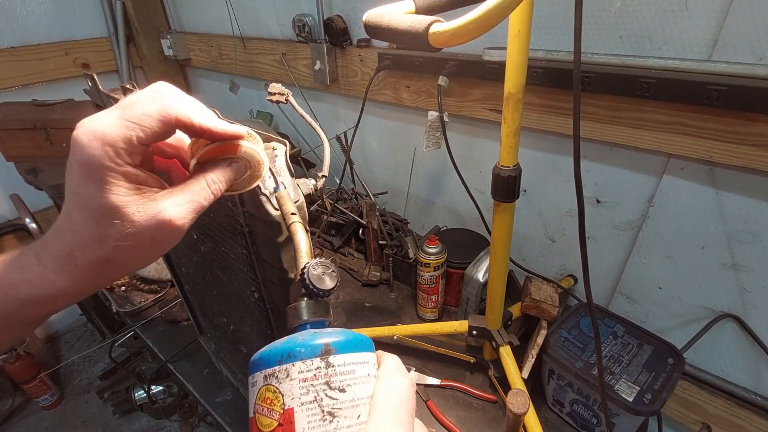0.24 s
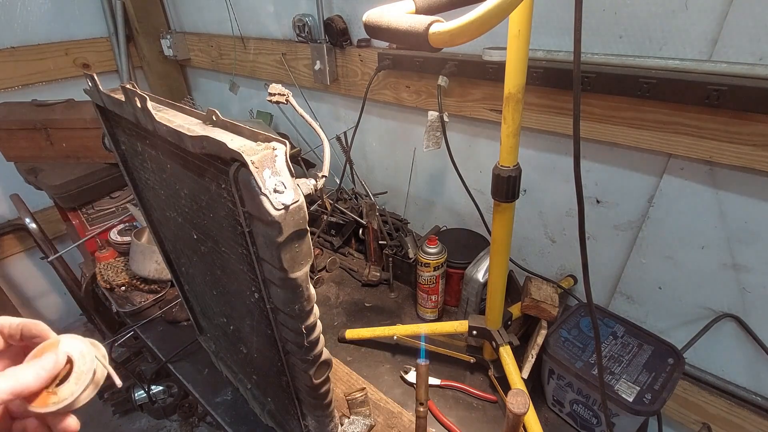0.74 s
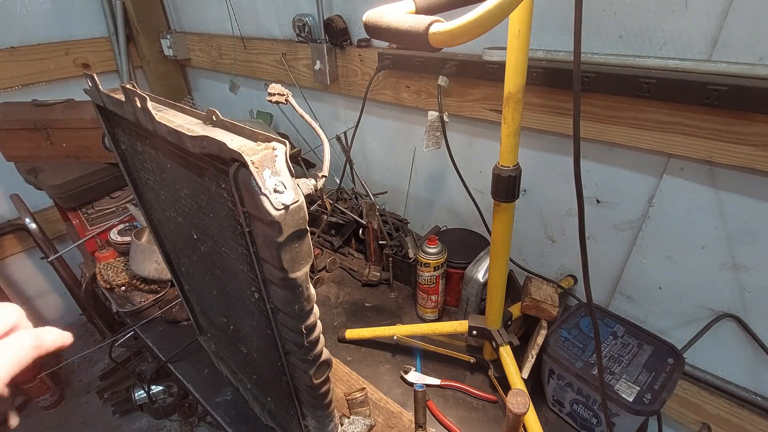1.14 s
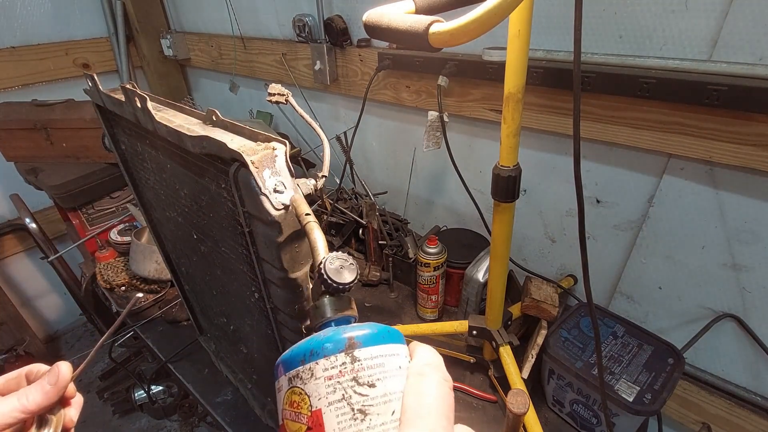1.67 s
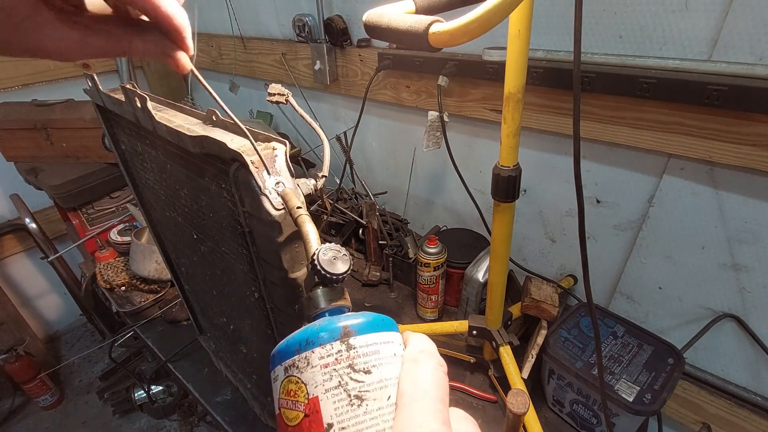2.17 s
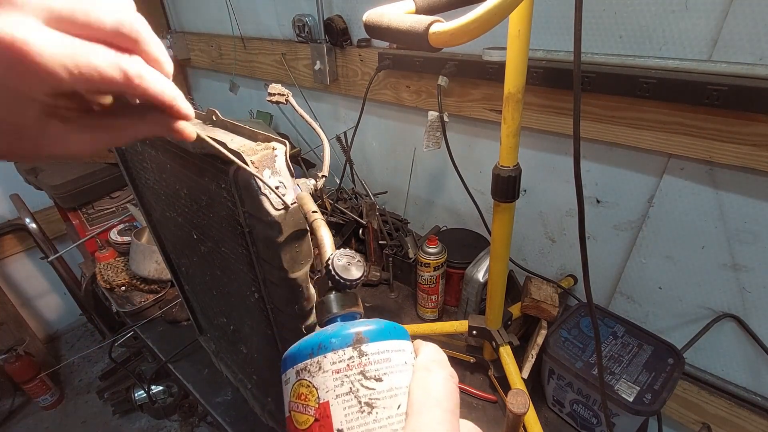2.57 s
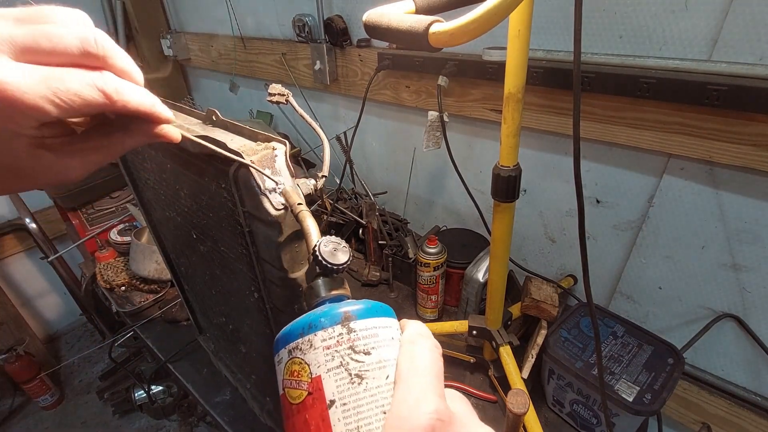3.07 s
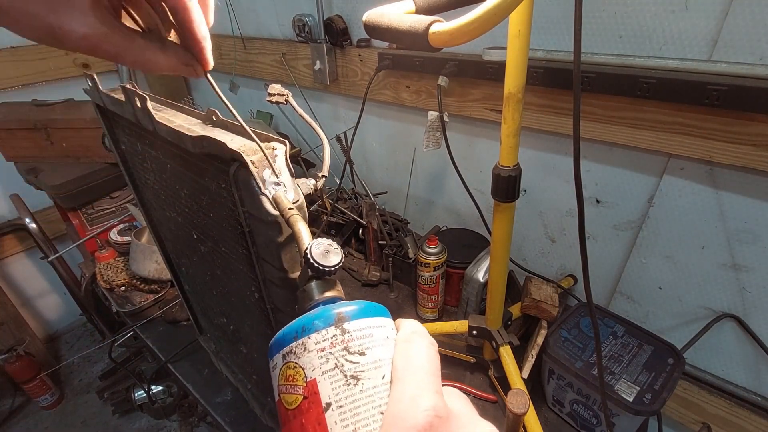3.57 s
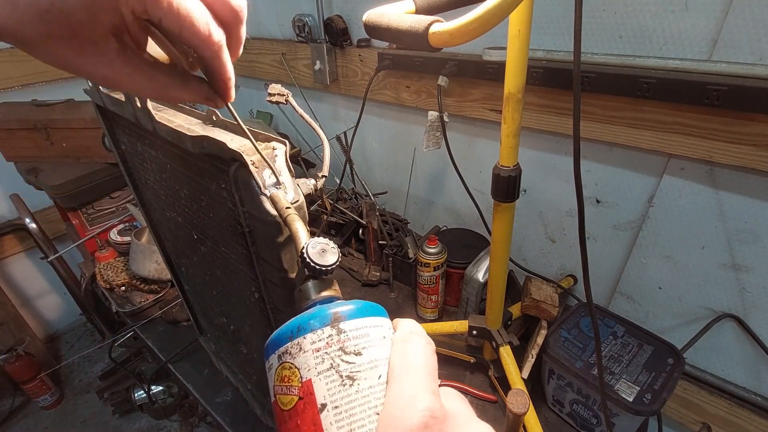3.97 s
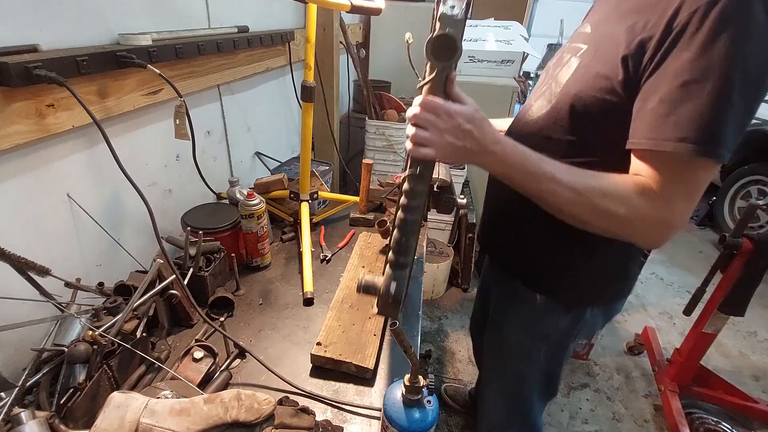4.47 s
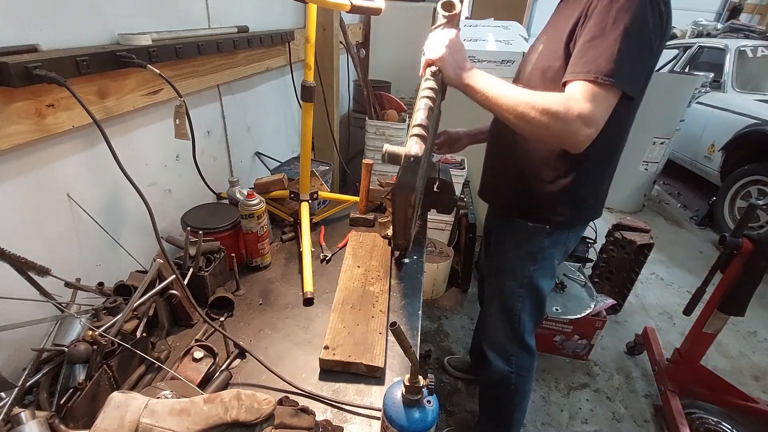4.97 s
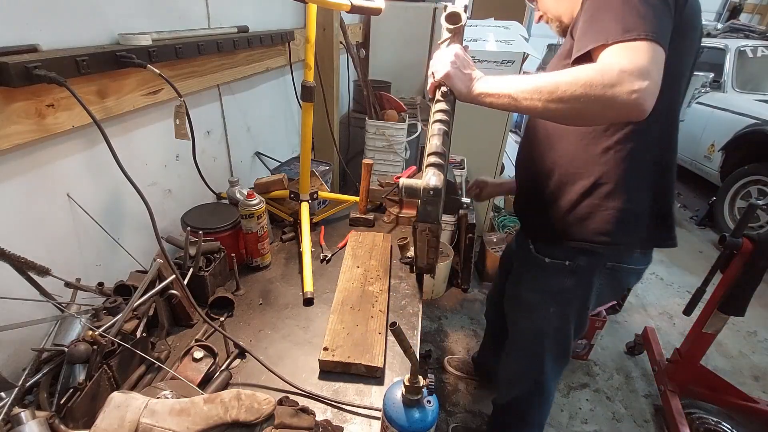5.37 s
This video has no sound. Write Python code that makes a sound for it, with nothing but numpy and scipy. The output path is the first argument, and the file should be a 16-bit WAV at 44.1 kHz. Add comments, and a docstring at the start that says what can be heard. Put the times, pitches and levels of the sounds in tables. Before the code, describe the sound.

From the start, a handheld gas torch burns close to the microphone, slightly left, in a workshop: a low, fluttering roar under a bright hiss and a faint, breathy high whistle. The flame rasps against a metal radiator, with brief flares. Around 0.8 seconds the rasp eases and there is one dull knock. At about 1.5 seconds the rasp returns and holds, with tiny spitting pops near 3.1, 3.8 and 4.2 seconds. The torch cuts off abruptly at 4.4 seconds. After an instant of silence, the radiator is handled with a thin rustle, short scrapes and a few ringing metallic clicks, the sharpest near 4.8 seconds. From 5 seconds it slides and lands on a wooden bench with a low rumble and dull, rattling knocks, loudest at 5.2 seconds. Lighter bumps and ticks continue until about 5.6 seconds.

```python
"""A gas torch roars close on the left, hisses at its jet and splashes on a metal radiator. All three are
turbulent noise, coloured by shifting reflections and reaching two microphone ports out of phase. The scene
changes. After a brief silence the radiator is shifted on a bench: friction gives a thin rustle and scrapes, and
impacts ring the metal's modes as clicks. Then the weight slides and lands on the wood with a low rumble and
dull knocks."""
import sys
import numpy as np
from scipy import signal
from scipy.fft import rfft, irfft, next_fast_len
from scipy.io import wavfile
from scipy.ndimage import uniform_filter1d

SR = 44100
rng = np.random.default_rng(int(sys.argv[2]) if len(sys.argv) > 2 else 0)


def materialize(psi):
    """Save the field psi as 16-bit PCM at rate SR to the path in sys.argv[1].

    A 1-D psi becomes a single channel; in a 2-D psi each row is a channel.
    """
    bounded = np.clip(np.atleast_2d(psi).T, -1, 1)
    quanta = np.round(bounded * 32767).astype(np.int16)
    wavfile.write(sys.argv[1], SR, quanta)


N = 247794
T = np.arange(N) / SR
N_FFT = next_fast_len(N)
F = np.maximum(np.arange(N_FFT // 2 + 1) * SR / N_FFT, 1.)
SIDES = np.array([[1], [-1]])  # left, right

# The moving torch: t/s, roar level/dB, jet level/dB, whistle level/dB, left minus right/dB
TORCH_LEVELS = [(0, -43.5, -55.5, -64, 6), (.22, -45, -57.5, -66, 3.5), (.45, -47, -57, -68, 3.5),
                (.6, -46.5, -55.5, -65, 5), (.84, -48, -53, -62, 3), (.93, -50.5, -55.5, -74, 5),
                (1.12, -47, -58, -78, 2.5), (1.3, -49, -58, -81, 4.5), (1.34, -42.5, -56, -74, -1),
                (1.42, -47.5, -54, -67, 5.5), (1.65, -44, -60, -61, 4), (2., -44.5, -57, -58, 5),
                (2.2, -47, -56, -59, 5.5), (2.33, -46.5, -55.5, -67, 5), (2.5, -45.5, -57, -63, 4.5),
                (2.7, -44.5, -55, -62, 4.5), (2.85, -46.5, -55, -62, 4), (3.05, -46.5, -56, -63, 4.5),
                (3.2, -46, -57, -66, 5), (3.36, -50.5, -55.5, -57, 4.5), (3.5, -48.5, -57.5, -65, 5.5),
                (3.7, -47, -57, -61.5, 4.5), (3.95, -47, -56.5, -59, 5), (4.2, -50, -58.5, -62, 5.5),
                (4.3, -45, -52.5, -75, 3.5), (4.41, -47.5, -51, -71, 6.5)]
# Timbre as it turns: t/s, whistle f/Hz, jet top gain/dB, lowest roar gain/dB, upper roar gain/dB
TORCH_TIMBRE = [(0, 11950, -4, -0.5, -1), (.4, 12200, -4, -3, -0.5), (.8, 12550, -7, 2, 2),
                (.93, 12400, -4, 0.5, -4), (1.3, 12400, -2, -1, 0), (1.45, 12200, -4, -1, -1),
                (1.75, 12650, 0, -1, -1.5), (2.05, 12450, -3, 1, -3), (2.4, 12500, -3, -0.5, 0.5),
                (2.8, 12600, -1, -1.5, 0), (3.3, 12500, 0, 0, 2.5), (3.65, 12600, -1, -1.5, 0),
                (4.03, 12700, 1, 2.5, 0), (4.3, 12500, -6, -3, -0.5), (4.41, 12500, -10, -3, -2.5)]
# Its bearing: t/s, stereo width/dB, lean of the jet to the left/dB
TORCH_AIM = [(0, -1, 3), (.42, -0.5, -1), (.55, 0.5, 1), (.76, -1.5, 2), (.9, -2.5, -4), (.94, -5.5, -2),
             (1.36, -7, -1), (1.42, -1.5, 1.5), (1.85, -0.5, 1), (2.3, -0.5, -2), (2.6, 0, 2.5),
             (3.1, -0.5, 1.5), (3.3, 0.5, 6.5), (3.5, 0, 4), (4., 0.5, 4), (4.25, 0, 1), (4.41, -0.5, 3.5)]
def torch():
    """Turbulence radiates broadband noise; one unsteady flow gives its bands a common flutter."""
    roar_db, jet_db, whistle_db, pan_db = curve(TORCH_LEVELS)
    whistle_hz, top_db, lowest_db, upper_roar_db = curve(TORCH_TIMBRE)
    width_db, lean_db = curve(TORCH_AIM)
    low_db, rasp_db, upper_db, sizzle_db, intake_db = impingement()
    flutter = walk(28.13)
    roaring = roar(roar_db, lowest_db, upper_roar_db, flutter)
    splashing = splash(low_db, rasp_db, upper_db, flutter)
    gas = sizzle(sizzle_db, flutter) + jet(jet_db, top_db, flutter) * pan(lean_db)
    hiss = air_intake(intake_db) + reflections(splashing, 2.4, 200, .12) + reflections(gas, 2.5, 200, .1)
    hiss += whistle(whistle_hz, whistle_db) * pan(lean_db)
    roaring = reflections(roaring, 1.77, 90, .063)
    return stereo_width(roaring * pan(pan_db), .79 * width_db) + stereo_width(hiss * pan(pan_db), width_db)

# Combustion spectrum: f/Hz, level/dB
ROAR_SPECTRUM = [(15, -60), (25, -12.5), (43, -17), (86, -5), (179, -2.5), (236, -0.5), (340, -2),
                 (457, -5), (593, -9), (719, -19), (1000, -22), (1250, -16.5), (1600, -11), (2080, -23),
                 (3520, -120)]
def roar(db, lowest_db, upper_db, flutter):
    """Combustion noise: unsteady heat release expands the gas and radiates mainly low frequencies."""
    flame = port_noise(ROAR_SPECTRUM, .89) * undb(db + .4 * flutter + 1.2 * walk(9) + .6 * walk(45))
    lowest, rest = split(flame, hz=150)
    middle, upper = split(rest, hz=330)
    return lowest * undb(lowest_db) + middle + upper * undb(upper_db)

# Flame on metal: start t/s, end t/s, rasp level/dB, upper rasp gain/dB
FLAME_CONTACTS = [(-.1, 0.72, -49, 0), (1.54, 1.662, -47, -2), (1.664, 1.76, -45.5, -2.5),
                  (1.784, 2.265, -50.5, 0.5), (2.256, 2.649, -49, 0.5), (2.651, 2.899, -48.5, 2.5),
                  (2.9, 3.098, -46.5, 1.5), (3.102, 3.274, -49, 3), (3.274, 3.802, -47, -3),
                  (3.799, 4.281, -47.5, -1)]
# Brief flares: peak t/s, half length/s, splash rise/dB, sizzle rise/dB
HISS_FLARES = [(0.059, 0.021, 9, 4), (0.332, 0.026, 6.5, 5.5), (0.432, 0.029, 7.5, 5),
               (0.543, 0.023, 4.5, 4), (0.789, 0.026, 6.5, 7.5), (0.626, 0.0068, 5, 1),
               (0.632, 0.029, 4.5, 4), (0.688, 0.02, 3, 3), (0.87, 0.02, 8.5, 10.5), (0.908, 0.083, 4, 0.5),
               (1.396, 0.023, 5.5, 6), (1.45, 0.049, 5.5, 2.5), (1.59, 0.032, 4.5, 3), (2.29, 0.019, 3, 3),
               (2.334, 0.015, 6.5, 6.5), (2.468, 0.03, 3.5, 4), (2.591, 0.039, 7, 7),
               (3.144, 0.23, 1.5, 2.5), (3.548, 0.049, 4.5, 2.5), (3.813, 0.075, 3.5, 4),
               (4.104, 0.02, 2, 5), (4.198, 0.023, 2.5, 2), (4.267, 0.012, 2.5, 0)]
def impingement():
    """A jet grows louder on striking a surface, while a free flame draws more air: band levels in dB."""
    free_db, free_upper_db = -56.5, -4
    touch_db, upper_db = 0, free_upper_db
    for start, end, contact_db, contact_upper_db in FLAME_CONTACTS:
        touching = soft_step(T - start, .0027) - soft_step(T - end, .0027)
        touch_db += (contact_db - free_db) * touching
        upper_db += (contact_upper_db - free_upper_db) * touching
    flares = np.array([np.exp(-((T - s) / half) ** 2) for s, half, *_ in HISS_FLARES])
    splash_rise, sizzle_rise = np.array(HISS_FLARES)[:, 2:].T @ flares
    low_db = -51.5 + .66 * touch_db + splash_rise
    rasp_db = free_db + touch_db + splash_rise
    sizzle_db = -65 + .19 * touch_db + sizzle_rise
    intake_db = -62 - .37 * touch_db + .13 * sizzle_rise
    return low_db, rasp_db, upper_db, sizzle_db, intake_db

# Spectrum of the flame spreading on metal: f/Hz, level/dB
SPLASH_SPECTRUM = [(530, -9), (900, -7), (965, -5), (1140, -4), (1290, 0.5), (1640, 0.5), (2240, -5),
                   (2650, -7), (3070, -10), (4800, -18), (6240, -45), (10600, -120)]
def splash(low_db, rasp_db, upper_db, flutter):
    """Impingement noise: eddies deflected by the radiator rasp in the middle frequencies."""
    low, rest = split(hollows(port_noise(SPLASH_SPECTRUM, .59)), hz=1435)
    rasp, upper = split(rest, hz=2630, order=5)
    bands = low * undb(low_db) + (rasp + upper * undb(upper_db)) * undb(rasp_db)
    return bands * undb(1.1 * flutter + .9 * walk(25.47) - .5 * SIDES)

# Two notches in the splash: t/s, upper notch f/Hz, upper notch gain/dB, lower notch gain/dB
SPLASH_NOTCHES = [(0, 2600, -4, 0), (.25, 2550, -9, -2), (.55, 2600, -7, -6), (.75, 2650, -5, 0),
                  (1., 2750, -2, 0), (1.6, 2600, -1, 0), (1.85, 2500, -11, 0), (2.2, 2520, -11, -2),
                  (2.4, 2650, -3, 0), (2.9, 2650, -5, -2), (3.3, 2700, -10, -8), (3.7, 2620, -13, -9),
                  (4.1, 2640, -13, -6), (4.41, 2600, -6, 0)]
def hollows(x, half_width_hz=130):
    """Band rejection: two narrow notches, wavering in pitch and depth, make the splash sound hollow."""
    hz, s, spectra = signal.stft(x, SR, nperseg=1024)
    frames = np.minimum((s * SR).astype(int), N - 1)
    centre_hz, *depths_db = curve(SPLASH_NOTCHES)
    dip_db = 0
    for pitch_ratio, depth_db in zip((1, .6), depths_db):
        offset_hz = hz[:, None] - (pitch_ratio * centre_hz + 50 * walk(8))[frames]
        wavering_db = depth_db * np.clip(1 + .5 * walk(10), 0, 2)
        dip_db += wavering_db[frames] * np.exp(-(offset_hz / half_width_hz) ** 2)
    return signal.istft(spectra * undb(dip_db), nperseg=1024)[1][:, :N]

# Gas jet spectrum: f/Hz, level/dB
JET_SPECTRUM = [(5000, -38), (8500, -12), (9810, -7), (10600, -1), (12600, 2), (13600, -0.5), (14300, 3.5),
                (15100, -0.5), (16200, 4)]
def jet(db, top_db, flutter):
    """Jet noise: fast gas shears against still air in a compact source, coherent at both ports."""
    hiss = port_noise(JET_SPECTRUM, 1) * undb(db + .87 * flutter + .5 * walk(24.63) + SIDES)
    lower, top = split(hiss, hz=13200)
    return lower + top * undb(top_db + 1.2 * walk(7))

# Sizzle spectrum: f/Hz, level/dB
SIZZLE_SPECTRUM = [(2820, -61), (4800, -7), (5310, -0.5), (5790, -3), (6960, -7), (8980, -7.5),
                   (10000, -7.5), (13000, -16), (22000, -120)]
def sizzle(db, flutter):
    """Fine-scale turbulence radiates a bright, mostly diffuse hiss."""
    return port_noise(SIZZLE_SPECTRUM, .13) * undb(db + flutter + .9 * walk(24.56) + 1.8 * SIDES)

# Spectrum of air entering the nozzle: f/Hz, level/dB
INTAKE_SPECTRUM = [(2470, -58), (4200, 4.5), (4700, 3.5), (4950, 12.5), (5300, 7.5), (5600, -13),
                   (5900, -41), (7670, -47), (13000, -120)]
def air_intake(db):
    """Entrainment: the gas draws in air, which hisses in a band near 5 kHz."""
    return port_noise(INTAKE_SPECTRUM, .12, shaded=False) * undb(db + 1.5 * walk(14) - 1.3 * SIDES)

def whistle(hz, db):
    """Narrow-band noise about a wandering centre frequency is heard as the jet's breathy whistle."""
    gain = undb(db + 2 * walk(5.9) + 1.3 * SIDES)
    phase = 2 * np.pi * np.cumsum(hz + 90 * walk(5.2)) / SR
    band = [(1, 0), (250, -1), (550, -9), (1500, -19)]  # offset f/Hz, level/dB
    return (noise(band, .27) * np.cos(phase) + noise(band, .26) * np.sin(phase)) * gain

# Flux pops: t/s, level/dB
FLUX_POPS = [(1.709, -57), (3.119, -46), (3.1545, -40.5), (3.815, -50), (4.1984, -51)]
# Their spectrum: f/Hz, level/dB
POP_SPECTRUM = [(2000, -30), (3500, 7), (4500, -1), (6500, -2), (9000, -9), (13000, -30)]
def flux_spits():
    """Impulsive sources: flux spits in the flame as bright pops that decay exponentially."""
    return noise(POP_SPECTRUM, .46) * pulses(FLUX_POPS, decay_s=.0044) * undb(2.2 * SIDES)

# Radiator modes: f/Hz, nominal width/Hz, level/dB
RADIATOR_MODES = [(690, 234, -8), (1436, 67, -10.5), (1910, 203, 1), (2390, 320, 0), (2820, 110, -4.5),
                  (3400, 100, -1), (4070, 120, -10), (4640, 130, -18), (5340, 350, -16), (8840, 760, -12)]
# Impacts: t/s, level/dB, then gain/dB of the crack, low modes, fourth mode and upper modes
METAL_IMPACTS = [(4.528, -37.5, -30, 3, 0, -6), (4.598, -54, -25, 9, -16, -11),
                 (4.706, -26, -9.5, -5, -8, -3), (4.783, -21, -10, -8, 1.5, -8), (4.795, -38, -1, 0, -5, 4),
                 (4.812, -45, 0, 7.5, -2, -6), (4.956, -30.5, -16, -9, -1.5, -4)]
# Spectrum of rough contact, in cracks, scrapes and ticks: f/Hz, level/dB
CONTACT_SPECTRUM = [(880, -15), (1500, -10), (1920, -7), (2060, -5.5), (3820, -9), (5310, -7.5),
                    (5870, -11), (7530, -10), (12000, -11.5), (13300, -9.5), (16200, -16)]
def metal_clicks(contact_s=.0056):
    """Impact excitation: a short rough contact cracks and rings the modes of the thin metal."""
    out, t = np.zeros((2, N)), np.arange(int(.12 * SR)) / SR
    crack = noise(CONTACT_SPECTRUM, .74)
    wall_tail = undb(-16) * np.exp(-t / .026)
    envelope = np.minimum(t / .0014, 1) * (np.exp(-(t / contact_s) ** 2) + wall_tail)
    for s, db, crack_db, low_db, fourth_db, upper_db in METAL_IMPACTS:
        span = slice(int(s * SR), int(s * SR) + len(t))
        roughness = rng.standard_normal((3, len(t)))
        force = envelope * (roughness[0] + .43 * roughness[1:])
        force[:, int(.0015 * SR)] += 4  # the firmest point of the contact
        tank = undb(low_db) * ring(force, RADIATOR_MODES[:2])
        middle = ring(force, RADIATOR_MODES[2:3]) + undb(fourth_db) * ring(force, RADIATOR_MODES[3:4])
        fins = undb(upper_db) * ring(force, RADIATOR_MODES[4:])
        out[:, span] += undb(db) * (tank + middle + fins + undb(crack_db) * envelope * crack[:, span])
    return out * pan(.5)

# Knocks: t/s, level/dB, thump f/Hz, rattle gain/dB, rattle top f/Hz, length/s, clank f/Hz, clank gain/dB
BENCH_IMPACTS = [(0.846, -27.5, 218, -17, 1990, 0.035, 594, -22),
                 (5.0472, -28, 233, -10, 3380, 0.026, 2150, -23),
                 (5.07, -41.5, 393, -4, 2520, 0.012, 890, -17),
                 (5.078, -34, 205, -16, 3000, .003, 595, -13),
                 (5.14, -42.5, 300, -0.5, 3060, 0.013, 1110, -18),
                 (5.182, -17.5, 281, -13, 5500, 0.013, 7750, -18.5),
                 (5.194, -23, 300, -11, 4500, 0.024, 1100, -12),
                 (5.223, -35.5, 268, -17, 2600, 0.037, 1150, -25),
                 (5.284, -35, 97, -31, 1000, 0.02, 300, -22),
                 (5.325, -38, 400, -11.5, 1670, 0.016, 1100, -3.5),
                 (5.361, -38.5, 107, -19, 1190, 0.036, 308, -9),
                 (5.403, -38.5, 95, -19, 1490, 0.038, 300, -17),
                 (5.486, -41.5, 198, -6, 2210, 0.028, 1640, -8.5),
                 (5.542, -51, 298, -11, 1980, 0.0046, 1490, 1),
                 (5.581, -36, 216, -16.5, 2500, 0.028, 410, -4.5),
                 (5.602, -31, 146, -19, 3020, 0.025, 375, -17)]
# Modes of the wood: f/thump f, nominal width/thump f, level/dB
WOOD_MODES = [(1., .4, -1), (1.85, .4, -19.5)]
# Spectrum of loose metal: f/Hz, level/dB
RATTLE_SPECTRUM = [(300, 11), (700, 0.5), (1200, 5), (2000, 2.5), (2840, -1.5), (5100, -8.5), (7200, -7),
                   (7700, -7), (8200, -13), (16000, -29)]
def knocks(shudder_s=.06):
    """Damped resonance: the weight lands on wood with a dull thump while loose metal clanks and rattles; the
    first knock, during the torch, is a tin set down."""
    out, t = np.zeros((2, N + SR)), np.arange(int(.1 * SR)) / SR
    loose_metal = np.pad(noise(RATTLE_SPECTRUM, .044), ((0, 0), (0, SR)))
    for s, db, hz, rattle_db, top_hz, length, clank_hz, clank_db in BENCH_IMPACTS:
        span = slice(int(s * SR), int(s * SR) + len(t))
        envelope = burst(t, length, rise=.0022) * np.exp(-t / shudder_s)
        roughness = rng.standard_normal((3, len(t)))
        roughness[0, :40] += 2.2  # first contact: one firm push
        force = envelope * (roughness[0] + .3 * roughness[1:])
        thump = ring(force, np.array(WOOD_MODES) * [hz, hz, 1])
        clank = ring(force, [(clank_hz, min(.085 * clank_hz, 160), 0)])
        rattle = signal.lfilter(*signal.butter(4, top_hz, fs=SR), envelope * loose_metal[:, span])
        out[:, span] += undb(db) * (thump + undb(clank_db) * clank + undb(rattle_db) * rattle)
    return out[:, :N] * pan(1.5)

# Sliding strokes: t/s, length/s, level/dB, change over the length/dB
SCRAPE_STROKES = [(4.492, 0.0094, -55, 0), (4.514, 0.026, -57.5, 1), (4.65, 0.027, -67, 0),
                  (4.714, 0.076, -58, -5), (4.779, 0.032, -39, -6), (4.813, 0.015, -45.5, -1),
                  (4.853, 0.029, -55, 4.5), (4.884, 0.012, -52, 9), (4.897, 0.018, -60, 2),
                  (4.912, 0.044, -47.5, 4), (4.955, 0.016, -46, -4), (4.983, 0.097, -62, 2),
                  (5.053, 0.036, -65, 0), (5.084, .02, -67, -6), (5.143, 0.04, -65.5, -1),
                  (5.189, 0.031, -48.5, 3.5), (5.219, .012, -55, -2), (5.233, .018, -68, 0),
                  (5.249, 0.034, -63, -3), (5.34, .015, -70, -1), (5.431, 0.017, -61, -1),
                  (5.58, 0.046, -63, 0)]
# Tiny dry ticks: t/s, level/dB
DRY_TICKS = [(5.083, -54), (5.149, -51), (5.216, -36), (5.249, -57), (5.283, -58), (5.415, -52),
             (5.449, -56), (5.482, -62), (5.515, -62), (5.582, -61)]
def scrapes(on_bench):
    """Sliding friction: rough surfaces hiss in grainy strokes, duller on the bench, and tick."""
    strokes = 0
    for s, length, db, change_db in SCRAPE_STROKES:
        progress = np.clip((T - s) / length, 0, 1)
        strokes += undb(db + change_db * progress) * burst(T - s, length, rise=.14 * length)
    strokes *= undb(1.6 * walk(150) + 1.8 * walk(500))
    dull, bright = split(noise(CONTACT_SPECTRUM, .76), hz=5500)
    scraping = (dull + bright * undb(-4.5 * on_bench)) * strokes
    ticks = (dull + bright) * pulses(DRY_TICKS, decay_s=.00049)
    return (scraping + ticks) * undb(.34 * SIDES)

# Strength of the rustle: t/s, level/dB
RUSTLE_LEVELS = [(4.49, -55), (4.71, -56), (4.886, -51), (5.04, -53.5)]
# Its onset after the silence: t/s, gain/dB
RUSTLE_ONSET = [(4.481, -86), (4.483, 1), (4.495, -0.5)]
# Its spectrum: f/Hz, level/dB
RUSTLE_SPECTRUM = [(18, -71), (30, -25), (170, -22), (540, 2), (760, 4), (988, -2.5), (1460, -12),
                   (1910, -2.5), (3980, -13), (4530, -16), (4910, -11.5), (8980, -25.5), (11400, -27),
                   (13300, -37), (16000, -32)]
def rustle():
    """Light friction of fins and sleeves: many small contacts merge into flickering noise."""
    db = curve(RUSTLE_LEVELS)[0] + curve(RUSTLE_ONSET)[0]
    return noise(RUSTLE_SPECTRUM, .69) * undb(db + 2 * walk(60) + 2.8 * SIDES)

# Strength of the rumble: t/s, level/dB
RUMBLE_LEVELS = [(5.05, -48), (5.242, -49.5), (5.619, -49)]
# Its spectrum: f/Hz, level/dB
RUMBLE_SPECTRUM = [(15, -40), (25, -8), (134, -3), (212, -16.5), (373, -13), (516, -17.5), (1130, -24),
                   (1330, -34), (1520, -26.5), (2160, -41), (5880, -51), (7110, -45), (7710, -43),
                   (8360, -48), (16000, -53)]
def bench_rumble(coherent_below_hz=397):
    """Forced vibration: the sliding weight shakes the bench, whose long waves reach both ports alike."""
    coherence = .15 + .85 / (1 + (F / coherent_below_hz) ** 2)
    return noise(RUMBLE_SPECTRUM, coherence) * undb(curve(RUMBLE_LEVELS)[0] + 1.5 * SIDES + 2.8 * walk(30))

def reflections(x, depth_db, width_hz, hold_s):
    """Interference with echoes off hands and radiator, modelled as drifting random peaks and dips."""
    spectra = signal.stft(x, nperseg=1024)[2]
    bins, frames = max(int(width_hz * 1024 / SR), 1), max(int(hold_s * SR / 512), 1)
    ripple = rng.standard_normal(spectra.shape[1:])
    for _ in range(2):
        ripple = uniform_filter1d(uniform_filter1d(ripple, bins, axis=0), frames, axis=1)
    return signal.istft(spectra * undb(depth_db * ripple / ripple.std()), nperseg=1024)[1][:, :N]

# Lead of the left port: f/Hz, phase/rad
PORT_LEAD = [(1, 0), (520, .8), (1030, .9), (1290, 2.4), (1980, 3.2), (2840, 4.0), (4050, 5.0), (4910, 7.4),
             (5770, 6.9), (6980, 6.3), (16500, 6.3)]
# Acoustic shadow of the microphone housing: f/Hz, left minus right/dB
HOUSING_SHADOW = [(300, -0.5), (700, 0.5), (1030, -6.5), (1380, -0.5), (1720, 0.5), (2070, 1), (2410, 1),
                  (2760, -1.5), (3100, -2.5), (3790, 5.5), (4480, -5), (5170, -3), (5510, -3.5),
                  (5860, -2.5), (7580, 0), (8610, -0.5), (9650, 1), (10700, -2), (11700, -1), (12750, -2),
                  (14800, -7.5)]
def port_noise(spectrum, coherence, shaded=True):
    """Path difference and diffraction give the torch's noise a different phase and level at each port."""
    shadow_db = over_frequency(HOUSING_SHADOW) if shaded else 0
    return noise(spectrum, coherence, over_frequency(PORT_LEAD), shadow_db)

def noise(spectrum, coherence, lead_rad=0, shadow_db=0):
    """Partial coherence: a shared wave plus a diffuse part at each port, scaled to rms 1."""
    colour = undb(over_frequency(spectrum, outside=-90))
    shared, *diffuse = rfft(rng.standard_normal((3, N_FFT)))
    direct = np.sqrt(coherence) * shared * np.exp(.5j * lead_rad * SIDES)
    field = direct + np.sqrt(1 - coherence) * np.array(diffuse)
    x = irfft(colour * field * pan(shadow_db), N_FFT)[:, :N]
    return x / np.sqrt(np.mean(x ** 2))

def ring(force, modes):
    """Modal superposition: each mode is two resonators in series; the sum is scaled to peak 1."""
    response = 0
    for hz, width, db in modes:
        resonator = signal.iirpeak(hz, hz / (1.96 * width), fs=SR)
        response += undb(db) * signal.lfilter(*resonator, signal.lfilter(*resonator, force))
    return response / np.abs(response).max()

def split(x, hz, order=3):
    """Crossover: the bands below and above a frequency."""
    return [signal.sosfilt(signal.butter(order, hz, kind, fs=SR, output="sos"), x)
            for kind in ("low", "high")]

def walk(rate):
    """Random modulation: ramps to a new value about rate times a second, with spread near 1."""
    hold = int(SR / rate)
    return 1.2 * uniform_filter1d(np.repeat(rng.standard_normal(N // hold + 1), hold), hold)[:N]

def pulses(events, decay_s):
    """Exponential decay from each (t/s, level/dB) event."""
    return sum(undb(db) * (T > s) * np.exp(-np.abs(T - s) / decay_s) for s, db in events)

def burst(t, length, rise):
    """Gate that opens within rise s and shuts after length s."""
    return np.clip(t / rise, 0, 1) * soft_step(length - t, .002)

def soft_step(t, edge_s):
    """Logistic transition from 0 to 1 about t = 0."""
    return 1 / (1 + np.exp(np.clip(-t / edge_s, -50, 50)))

def curve(table):
    """Linear interpolation in time of each column after t/s."""
    s, *columns = np.transpose(table)
    return [np.interp(T, s, column) for column in columns]

def over_frequency(table, outside=None):
    """Interpolation of (f/Hz, value) rows on a logarithmic frequency axis."""
    hz, values = np.transpose(table)
    return np.interp(np.log(F), np.log(hz), values, left=outside, right=outside)

def stereo_width(x, db):
    """Apparent width follows the difference between the ports, scaled here by db."""
    mid = x.mean(axis=0)
    return mid + undb(db) * (x - mid)

def pan(db):
    """Level difference, left minus right, as two gains."""
    return undb(db * SIDES / 2)

def undb(db):
    """Amplitude ratio of a level in dB."""
    return 10 ** (np.asarray(db) / 20)

# The scene changes: the torch sound drops and falls silent: t/s, gain/dB
TORCH_CUTOFF = [(4.414, 2), (4.417, -14), (4.436, -20), (4.438, -87)]
def scene():
    """Superposition: the torch, then the radiator's handling, where rustle gives way to rumble."""
    flame = (torch() + flux_spits()) * undb(curve(TORCH_CUTOFF)[0])
    on_bench = T > RUMBLE_LEVELS[0][0]
    friction = rustle() * ~on_bench + scrapes(on_bench) + bench_rumble() * on_bench
    return flame + friction + metal_clicks() + knocks()

def record(dry):
    """Band limiting: a steep low-pass removes the treble above 15750 Hz."""
    return signal.sosfilt(signal.ellip(14, .2, 75, 15750, fs=SR, output="sos"), dry)

dry = scene()
out = record(dry)
materialize(out)
```